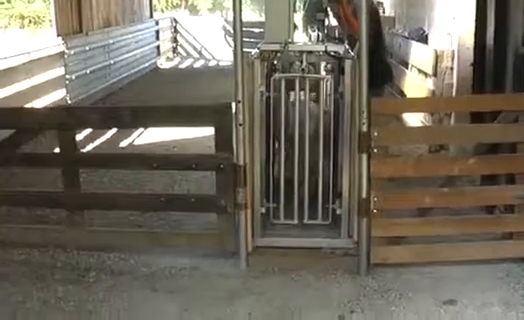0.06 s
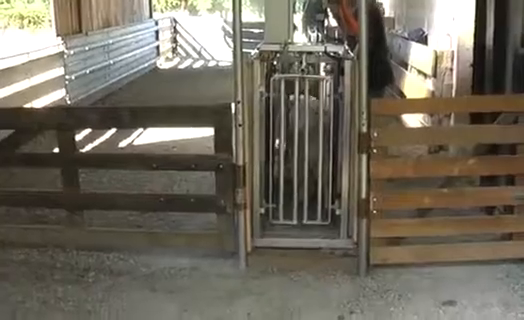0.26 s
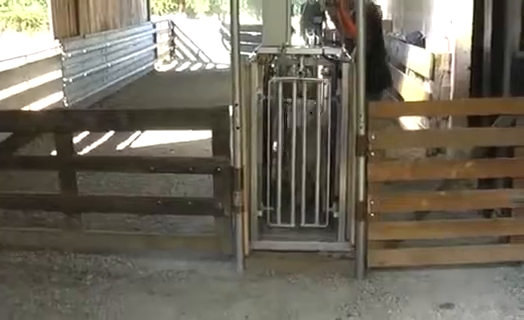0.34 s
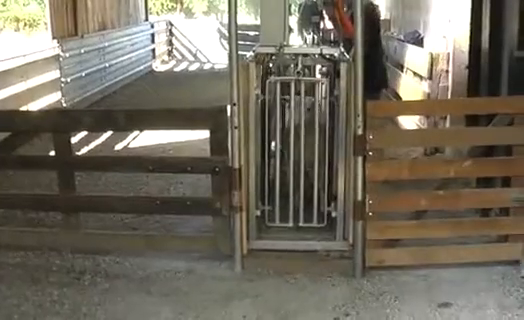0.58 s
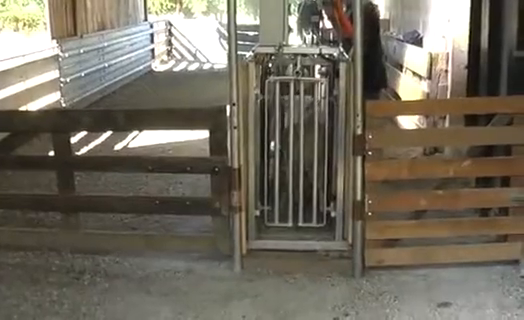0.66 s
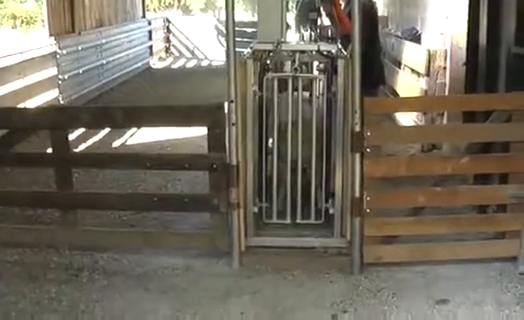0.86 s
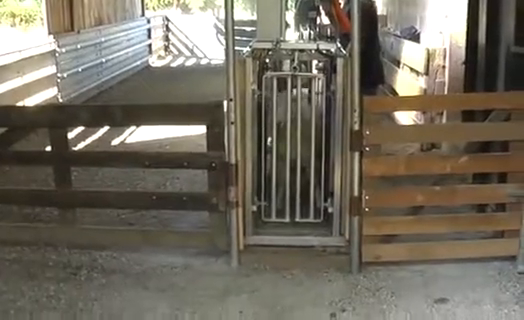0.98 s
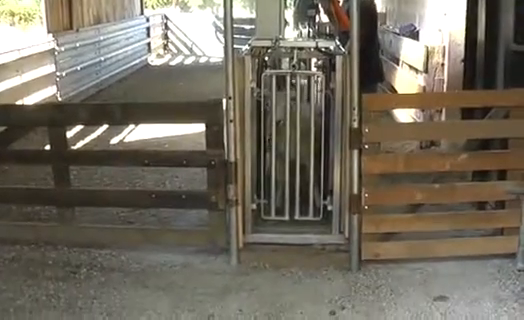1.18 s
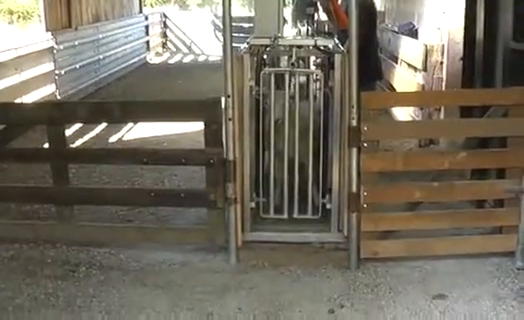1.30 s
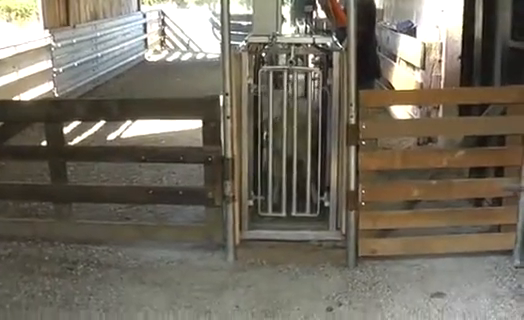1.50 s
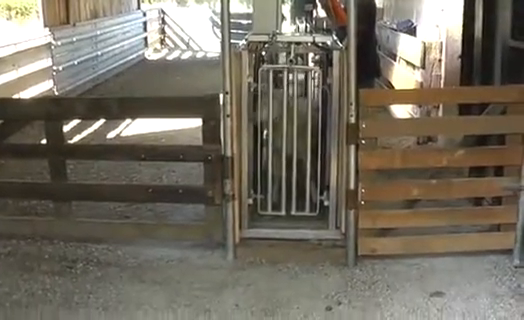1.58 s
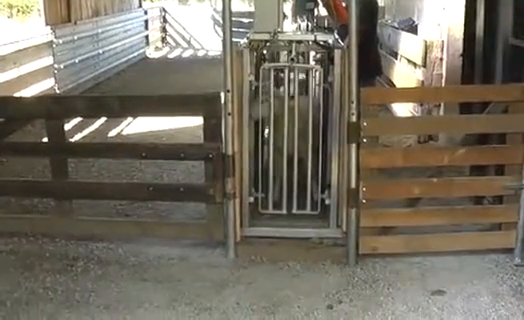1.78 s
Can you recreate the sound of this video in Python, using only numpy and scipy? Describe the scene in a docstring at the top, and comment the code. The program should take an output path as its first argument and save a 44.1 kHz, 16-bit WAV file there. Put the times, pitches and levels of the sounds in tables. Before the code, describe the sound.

Metal gate scrapes and clanks shut, then knocks lightly in a quiet farm shed.

```python
"""A steel gate knocks and scrapes along, clanks shut and rebounds on a livestock weighing crate nearby.
Each blow rings the bars and a dense bed of frame and panel modes; the latch snaps, its pin clinks,
and weaker knocks and faint rustles follow. The crate's deck thuds dully.
The quiet shed adds a short tail to the blows over a low background."""
import sys
import numpy as np
from scipy import signal
from scipy.fft import irfft
from scipy.io import wavfile

SR = 44100
rng = np.random.default_rng(int(sys.argv[2]) if len(sys.argv) > 2 else 0)


def wav_out(sig):
    """Save sig, one row per channel (or a flat mono array), as 16-bit PCM at SR to the path in sys.argv[1]."""
    wavfile.write(sys.argv[1], SR, np.round(np.clip(np.atleast_2d(sig).T, -1, 1) * 32767).astype(np.int16))


N = 81585


def undb(db):
    """Decibels to gain."""
    return 10 ** (np.asarray(db) / 20)


def along(hz, points):
    """Interpolate (Hz, value) points on a log-frequency axis."""
    point_hz, values = np.array(points, float).T
    return np.interp(np.log(np.maximum(hz, 1)), np.log(point_hz), values)


def resonances(hz, peaks):
    """Gain of a set of resonance peaks."""
    return sum(undb(db) / (1 + ((hz - peak_hz) / width_hz) ** 2) for peak_hz, width_hz, db in peaks)


def stereo(mid, side):
    """Left and right from mid and side."""
    return np.array([mid + side, mid - side])


def fade(t, t60_s):
    """Exponential decay, 60 dB in t60_s."""
    return np.exp(-np.log(1000) * t / np.maximum(t60_s, 1e-3))


def rise(t, length_s):
    """Linear ramp from 0 to 1."""
    return np.clip(t / max(length_s, 1e-4), 0, 1)


def waver(step_s):
    """Random curve, spread near 1."""
    return np.interp(np.arange(N) / SR / step_s, np.arange(1000), rng.standard_normal(1000))


def add(out, start_s, sound):
    """Mix a sound in at its time."""
    i = max(int(start_s * SR), 0)
    out[:, i:i + sound.shape[1]] += sound[:, :N - i]


# Stereo width (frequency [Hz], side minus mid [dB])
STEREO_WIDTH = [(30, -8.5), (125, -16.5), (330, -14.5), (700, -9), (2500, -3), (8000, -5.5)]
def diffuse(hz, gain):
    """Stereo spectrum of random-phase partials; mid rms 1 as a sound."""
    mid, side = np.exp(2j * np.pi * rng.random((2, len(hz))))
    scale = len(hz) * np.sqrt(2 / np.sum(gain ** 2))
    return stereo(mid, side * undb(along(hz, STEREO_WIDTH))) * gain * scale


def wash(spectrum):
    """Steady coloured stereo noise."""
    hz = np.arange(N // 2 + 1) * SR / N
    return irfft(diffuse(hz, undb(along(hz, spectrum))), N)


def strikes(events, peaks, rise_s, t60_s):
    """Decaying noise bursts in the resonances of one part."""
    out, t, hz = np.zeros((2, N)), np.arange(SR) / SR, np.arange(SR // 2 + 1)
    for start_s, db, pitch in events:
        noise = irfft(diffuse(hz, resonances(hz / pitch, peaks)), SR)
        add(out, start_s, undb(db) * noise * rise(t, rise_s) * fade(t, t60_s))
    return out


# Shed background (frequency [Hz], relative density [dB])
AIR_SPECTRUM = [(15, -60), (25, -29.5), (45, -5), (107, -7.5), (134, 0), (212, -6.5), (254, -4), (412, -13),
                (492, -24), (619, -10.5), (1230, -23), (1550, -21.5), (2330, -26), (11000, -34),
                (14300, -57), (22000, -120)]
def air(level_db=-59, waver_db=2.5):
    """Low, gently wavering background of the shed."""
    return wash(AIR_SPECTRUM) * undb(level_db + waver_db * waver(step_s=.021))


# Rustles (time [s], length [s], level [dB])
RUSTLE_EVENTS = [(1.261, 0.09, -67.5), (1.614, 0.061, -64), (1.679, 0.13, -68.5)]
# Rustle colour (frequency [Hz], relative density [dB])
RUSTLE_SPECTRUM = [(150, -20), (700, 4), (1200, -5), (4500, -7), (11000, -13.5)]
def rustle(edge_s=.019):
    """Something shifts softly in the crate."""
    t = np.arange(N) / SR
    envelope = sum(undb(db) * rise(t - start_s, edge_s) * rise(start_s + length_s - t, edge_s)
                   for start_s, length_s, db in RUSTLE_EVENTS)
    return wash(RUSTLE_SPECTRUM) * envelope


# Scrape colour (frequency [Hz], relative density [dB])
SLIDE_SPECTRUM = [(59, -35), (100, -10.5), (332, -3.5), (502, -20), (599, -12.5), (923, -16), (9220, -32),
                  (11000, -38), (14300, -63.5), (22000, -120)]
def slide(level_db=-43.5, rough_db=1, travel_s=.2, stop_s=.018):
    """The moving gate scrapes unevenly until it meets the post."""
    moving = rise(travel_s + stop_s - np.arange(N) / SR, stop_s)
    return wash(SLIDE_SPECTRUM) * moving * undb(level_db + rough_db * waver(step_s=.006))


# Deck thuds (time [s], level [dB], pitch [ratio])
DECK_THUDS = [(0.001, -37, 1.13), (0.183, -35, 1.05), (0.345, -46, 1), (0.495, -45.5, 1.07),
              (0.62, -49.5, 1.26), (0.69, -45.5, 1.06), (0.808, -40, 1.234), (1.325, -63, 0.93),
              (1.53, -60.5, 1)]
# Deck resonances (frequency [Hz], half-width [Hz], relative level [dB])
DECK_PEAKS = [(160, 18, -2), (200, 30, -5), (276, 15, -1.5), (338, 70, -7.5)]
def deck():
    """The deck thuds in its low resonances."""
    return strikes(DECK_THUDS, DECK_PEAKS, rise_s=.008, t60_s=.63)


# Latch snaps (time [s], level [dB], pitch [ratio])
LATCH_SNAPS = [(0.2030, -10, 1), (0.2045, -5.5, 1), (0.2935, -26, 1), (1.467, -57, 0.99)]
# Latch resonances (frequency [Hz], half-width [Hz], relative level [dB])
LATCH_PEAKS = [(4700, 350, 0), (6200, 600, -4.5), (7650, 310, 2.5)]
# Pin clinks (time [s], level [dB], pitch [ratio])
PIN_CLINKS = [(0.292, -24, 1.2), (0.306, -27, 1), (0.537, -58, 1.1), (0.5505, -37, 1.025)]
# Pin resonance (frequency [Hz], half-width [Hz], relative level [dB])
PIN_PEAKS = [(4345, 88, 0)]
def latch():
    """The latch snaps in broad, high resonances; its pin rings longer in a narrow one."""
    snaps = strikes(LATCH_SNAPS, LATCH_PEAKS, rise_s=.0005, t60_s=.024)
    clinks = strikes(PIN_CLINKS, PIN_PEAKS, rise_s=.0005, t60_s=.06)
    return snaps + clinks


# Zone centres: bass, low mid, mid, high, top (frequency [Hz])
ZONE_CENTRES_HZ = (250, 800, 1800, 4500, 8000)
# Dense frame and panel modes (frequency [Hz], relative density [dB])
FRAME_SPECTRUM = [(29, -56.5), (50, -31), (144, -2), (222, -18.5), (266, -3), (381, -5.5), (427, -3),
                  (500, -19.5), (599, -1.5), (701, -3.5), (898, -5.5), (961, -3), (1150, -12), (1480, -7),
                  (1890, -6), (2370, -9.5), (3110, -11), (3330, -10), (4080, -10), (4360, -5.5),
                  (4670, -6.5), (8020, -6.5), (11000, -15.5), (14300, -46.5), (22000, -120)]
# Frame decay (frequency [Hz], base T60 [s])
FRAME_DECAY = [(250, 0.69), (800, 0.35), (1800, 0.43), (4500, 0.27), (8000, 0.15)]
# Shed decay (frequency [Hz], T60 [s])
SHED_DECAY = [(250, 1.2), (800, 1.16), (1800, 0.83), (4500, 0.54), (8000, 0.32)]
# Bar modes (frequency [Hz])
BAR_MODES_HZ = (275, 613, 961.5, 1415.5, 1438, 1516, 1593, 1665.5, 1832.6, 1945, 2167, 3365, 4331, 4409,
                4888, 5502, 5552, 6274.5, 6717, 7788, 8007, 8117, 8221, 10330)
# Bar modes (relative level [dB])
BAR_MODES_DB = (-22, -20.5, -15, -22, -22.5, -21.5, -20, -20, -20.5, -16, -22, -16.5, -19.5, -19.5, -17,
                -19.5, -20, -19.5, -18, -18.5, -20, -20.5, -16.5, -21.5)
# Blows (time [s], rise [s], ring length [ratio], struck part [Hz], level in each of five zones [dB])
GATE_BLOWS = [(0.000, .003, 0.58, 279, -25, -33.5, -36.5, -46.5, -57),
              (0.053, .004, 1.6, 7500, -29.5, -59, -47, -68, -68),
              (0.156, 0.0082, 1.14, 331, -25.5, -29, -29.5, -41, -40.5),
              (0.174, 0.0056, 1.6, 627, -28, -33.5, -28, -31.5, -38),
              (0.2, 0.0066, 1.27, 7500, -25, -24.5, -13.5, -16.5, -13),
              (0.230, .008, 0.64, 965, -36, -17, -26.5, -32.5, -35),
              (0.291, 0.0036, 0.69, 571, -22.5, -18.5, -14.5, -14, -11),
              (0.304, 0.0024, 0.93, 1468, -23, -27, -17.5, -24.5, -18),
              (0.436, 0.0083, 0.75, 7500, -45.5, -45, -36, -51, -47.5),
              (0.536, 0.0036, 0.42, 4390, -45, -66.5, -61.5, -52, -46),
              (0.550, 0.0029, 0.59, 8600, -44.5, -41, -40.5, -34, -40.5),
              (0.790, 0.0039, 0.78, 200, -33, -30, -33, -40, -52.5),
              (0.842, .006, 0.81, 962, -41, -42, -51.5, -63, -72),
              (0.945, 0.0035, 0.8, 275, -40, -47.5, -71, -67, -79),
              (1.032, .002, 0.4, 7560, -45, -57, -58, -58, -57.5),
              (1.465, .003, 0.54, 1500, -37.5, -49.5, -55.5, -57, -52.5)]
def gate(frame_db=-1, bar_db=-2, shed_db=-14.5, struck_db=9, direct_side_db=-3, bar_side_db=-11.5):
    """Blows ring bars and frame, most of all the part struck; the shed's wider tail follows each."""
    out, t, hz = np.zeros((2, N)), np.arange(SR) / SR, np.arange(SR // 2 + 1)
    zones = np.array([along(hz, list(zip(ZONE_CENTRES_HZ, row))) for row in np.eye(5)])
    frame_t60_s = along(ZONE_CENTRES_HZ, FRAME_DECAY)[:, None]
    shed_t60_s = along(ZONE_CENTRES_HZ, SHED_DECAY)[:, None]
    shed = undb(shed_db) * rise(t, length_s=.02) * fade(t, shed_t60_s)
    # Frame modes vary in strength every 28 Hz, except in the bass.
    ripple_db = 2 * np.interp(hz / 28, hz, rng.standard_normal(len(hz)))
    frame_gain = undb(along(hz, FRAME_SPECTRUM) + ripple_db * (1 - zones[0] - zones[1] / 2))
    bar_hz = np.array(BAR_MODES_HZ)
    bar_t60_s = .5 * (bar_hz[:, None] / 1000) ** -.3
    bar_pan = stereo(.72, undb(bar_side_db) * rng.standard_normal(len(bar_hz)))
    for start_s, rise_s, ring, struck_hz, *zone_db in GATE_BLOWS:
        colour_db = along(hz, list(zip(ZONE_CENTRES_HZ, zone_db)))
        colour_db += struck_db * resonances(hz, [(struck_hz, .11 * struck_hz, 0)])
        spectrum = diffuse(hz, frame_gain) * undb(colour_db)
        left, right = irfft(zones * spectrum[:, None], SR)
        direct = undb(frame_db) * fade(t, frame_t60_s * ring)
        tail = shed * ring
        mid = (left + right) / 2 * np.hypot(direct, tail)
        side = (left - right) / 2 * np.hypot(direct * undb(direct_side_db), tail)
        frame = stereo(mid.sum(axis=0), side.sum(axis=0))
        cycles = bar_hz[:, None] * t + rng.random((len(bar_hz), 1))
        modes = fade(t, bar_t60_s * np.sqrt(ring)) * np.sin(2 * np.pi * cycles)
        mode_db = bar_db + np.array(BAR_MODES_DB) + np.interp(bar_hz, hz, colour_db)
        bars = (np.sqrt(2 * ring) * undb(mode_db) * bar_pan) @ modes
        add(out, start_s, (frame + bars) * rise(t, rise_s))
    return out


def scene(right_bias_db=.34):
    """The crate stands almost straight ahead."""
    pan = undb([[-right_bias_db / 2], [right_bias_db / 2]])
    return latch() * pan + deck() + air() + slide() + rustle() + gate() * pan


def record(dry, ceiling=.82, cutoff_hz=11200):
    """The recorder clips peaks below full scale and cuts the top steeply."""
    lowpass = signal.firwin(301, cutoff_hz, window=("kaiser", 9), fs=SR)[None]
    return signal.fftconvolve(np.clip(dry, -ceiling, ceiling), lowpass, mode="same", axes=1)


dry = scene()
out = record(dry)
wav_out(out)
```